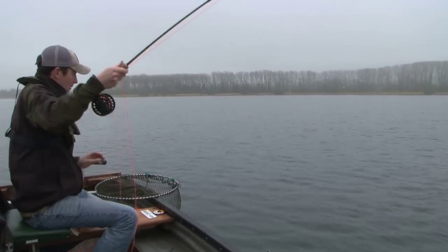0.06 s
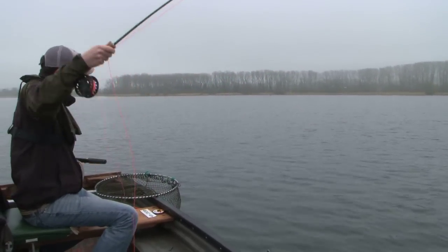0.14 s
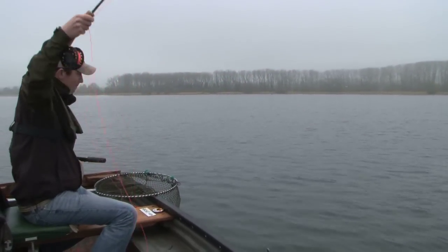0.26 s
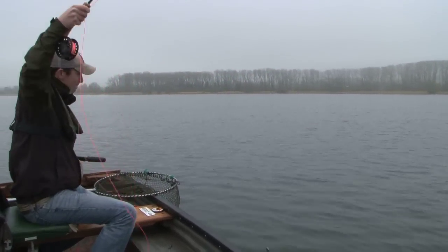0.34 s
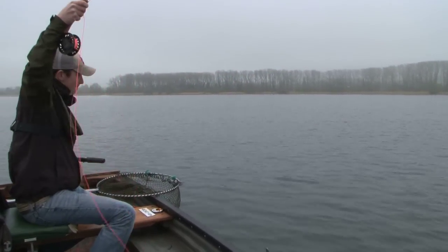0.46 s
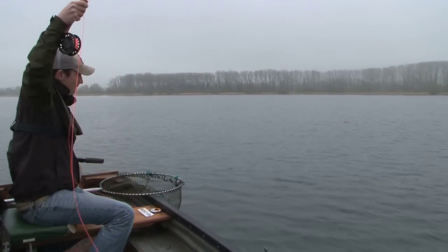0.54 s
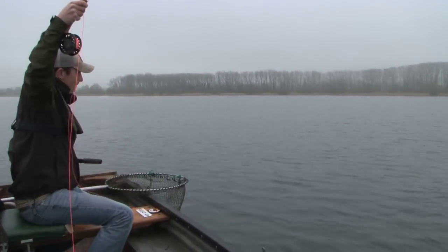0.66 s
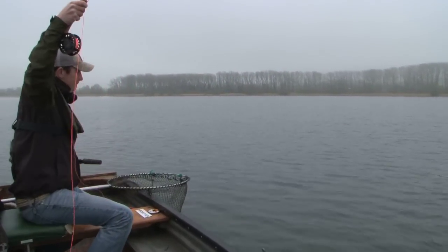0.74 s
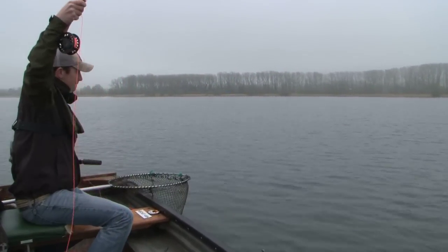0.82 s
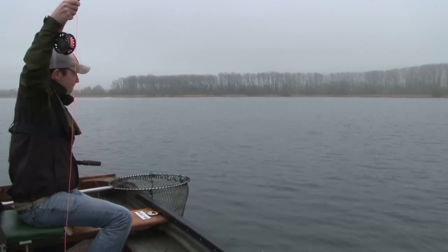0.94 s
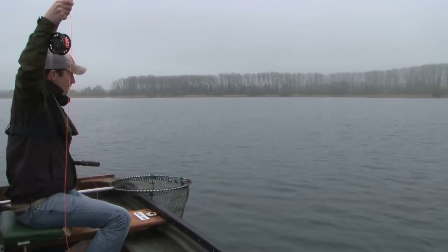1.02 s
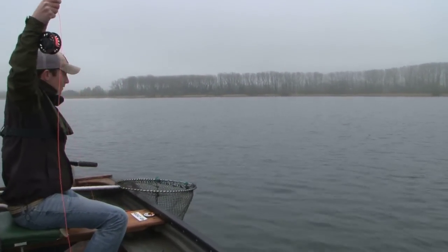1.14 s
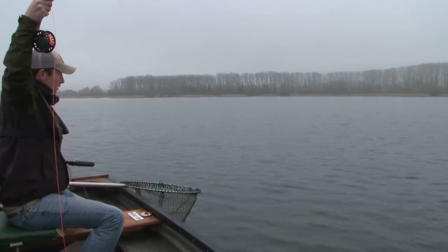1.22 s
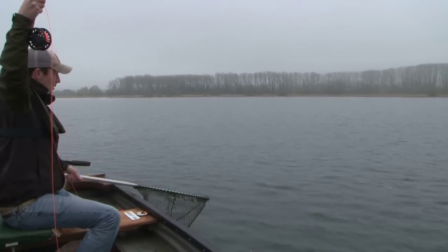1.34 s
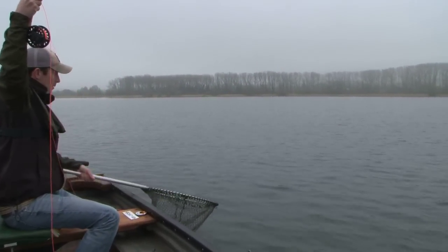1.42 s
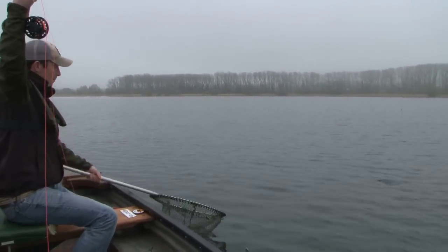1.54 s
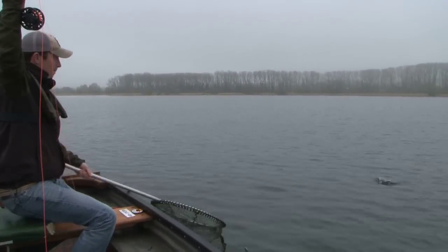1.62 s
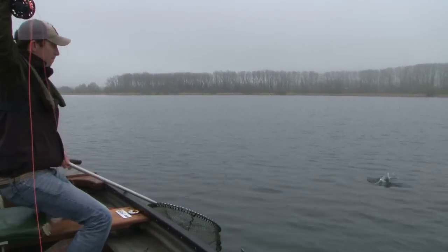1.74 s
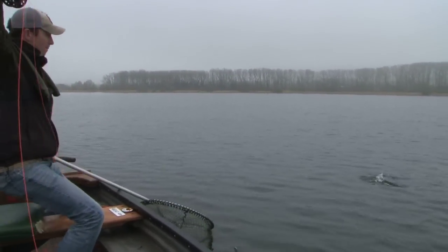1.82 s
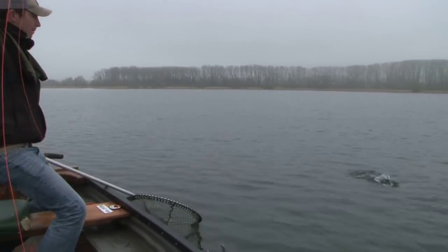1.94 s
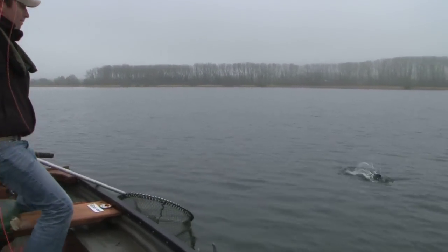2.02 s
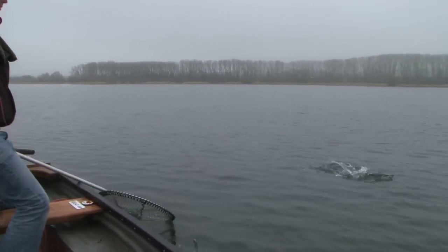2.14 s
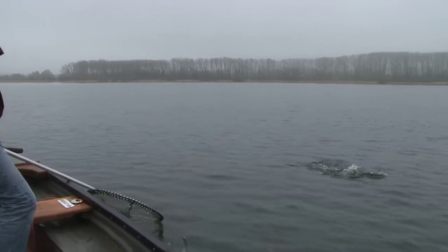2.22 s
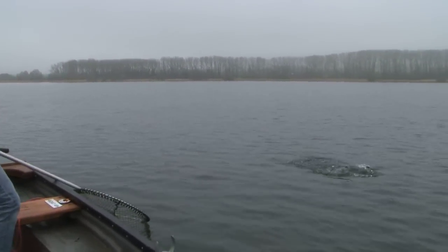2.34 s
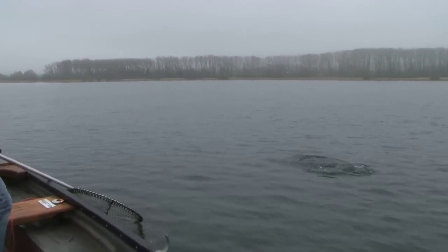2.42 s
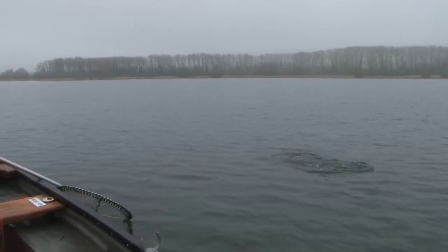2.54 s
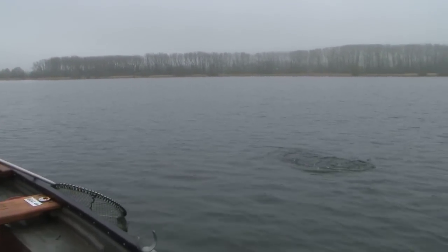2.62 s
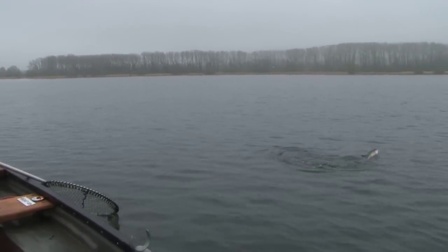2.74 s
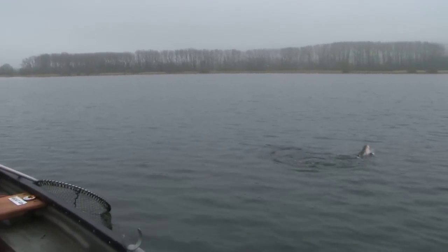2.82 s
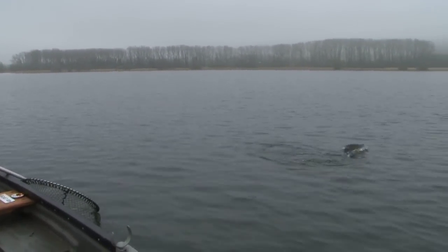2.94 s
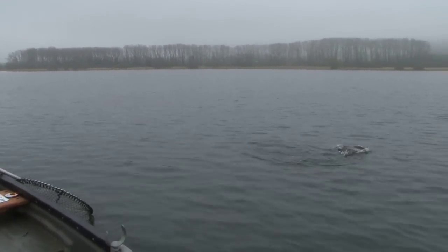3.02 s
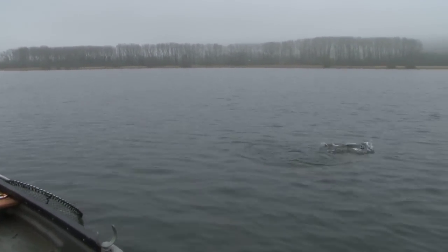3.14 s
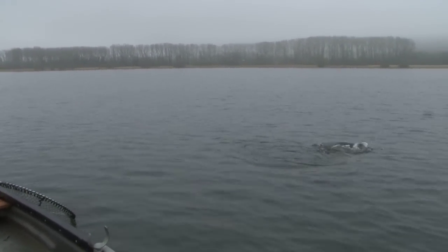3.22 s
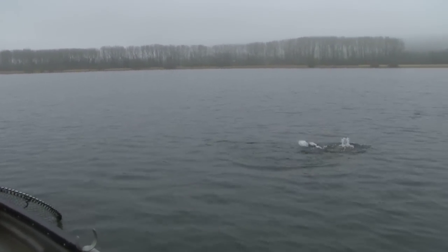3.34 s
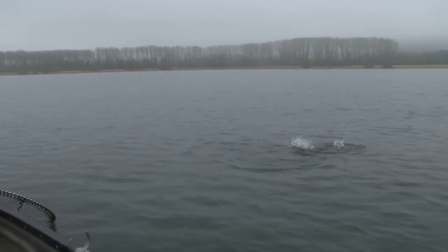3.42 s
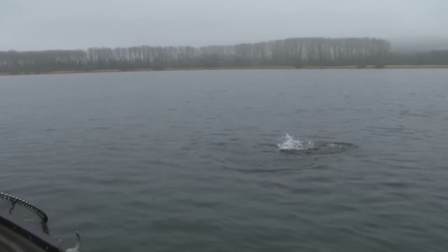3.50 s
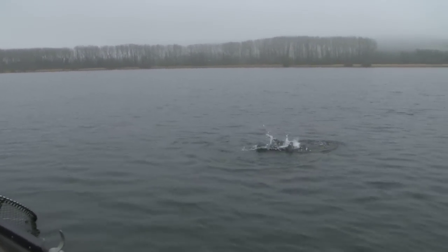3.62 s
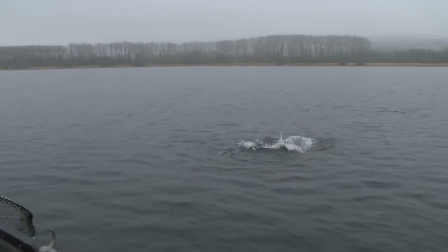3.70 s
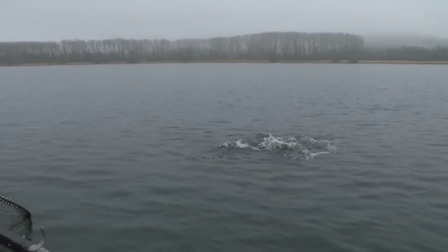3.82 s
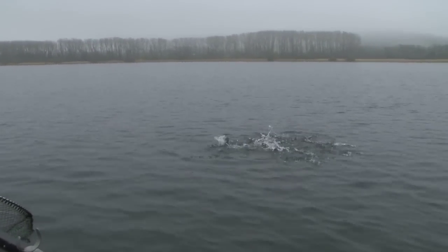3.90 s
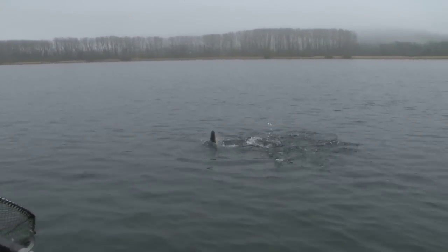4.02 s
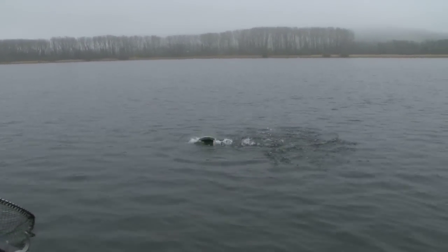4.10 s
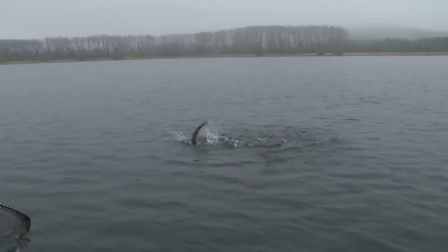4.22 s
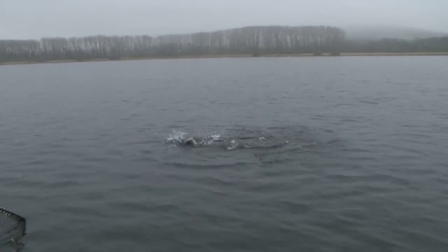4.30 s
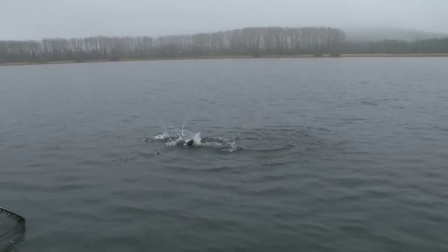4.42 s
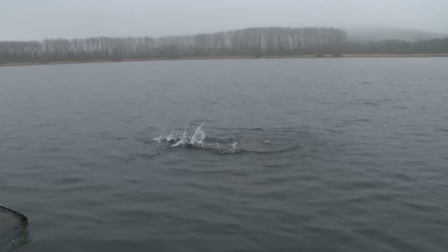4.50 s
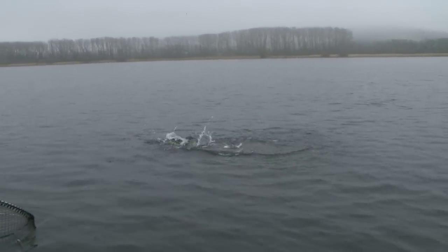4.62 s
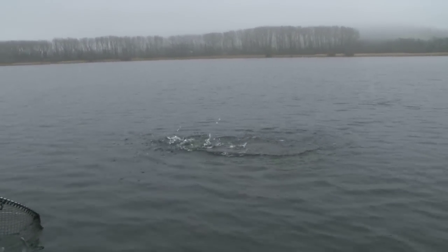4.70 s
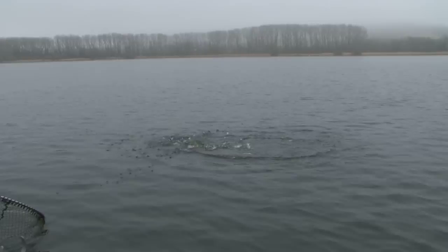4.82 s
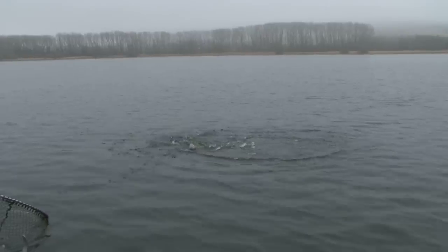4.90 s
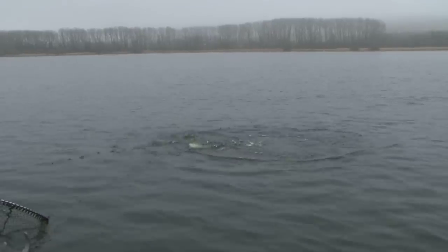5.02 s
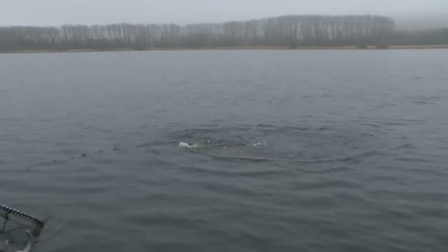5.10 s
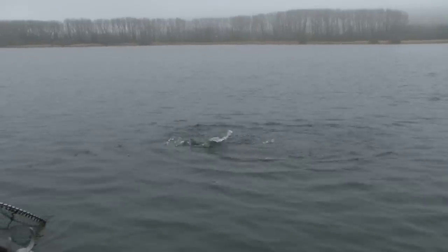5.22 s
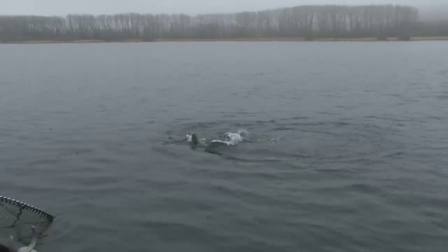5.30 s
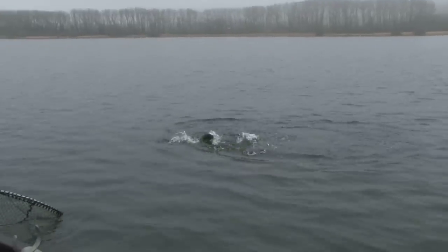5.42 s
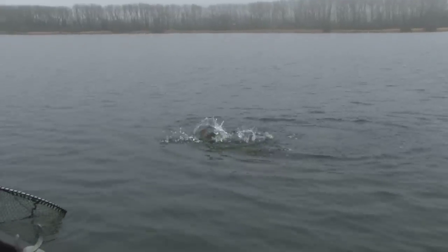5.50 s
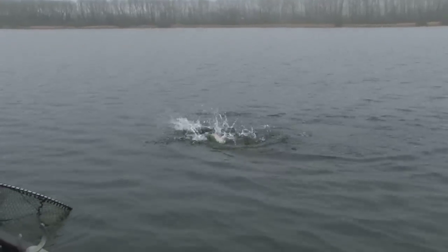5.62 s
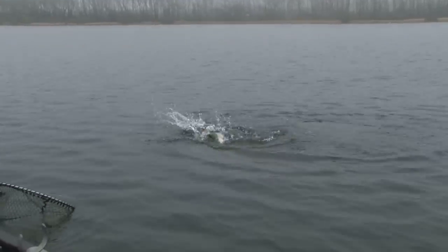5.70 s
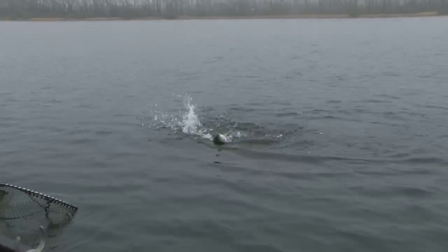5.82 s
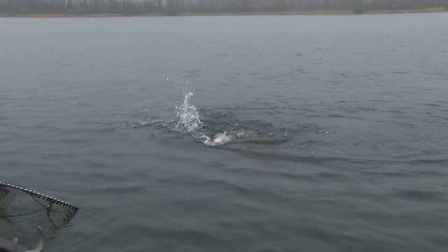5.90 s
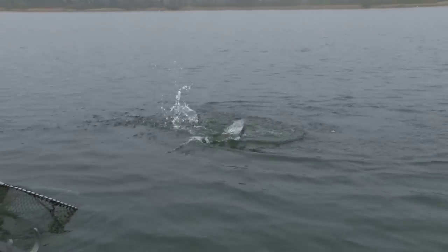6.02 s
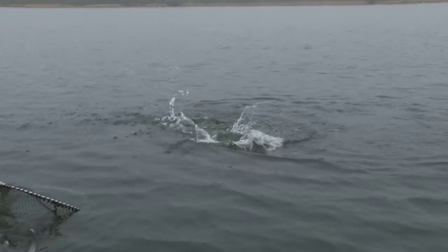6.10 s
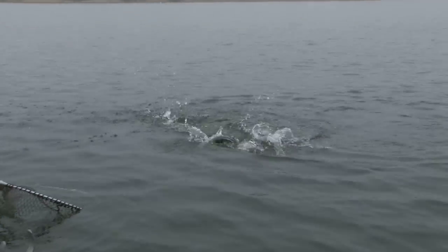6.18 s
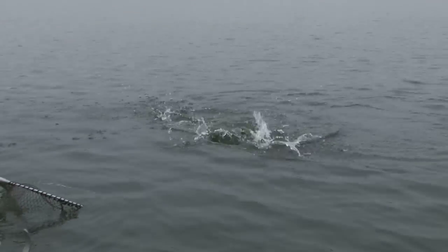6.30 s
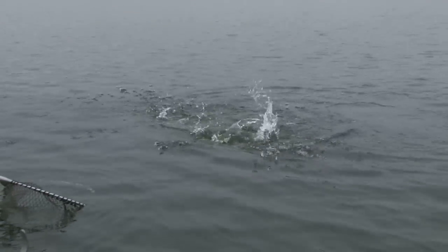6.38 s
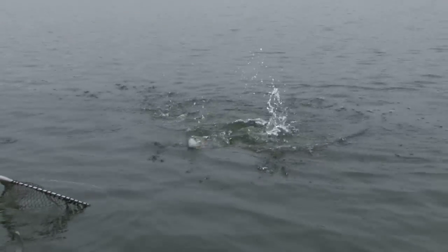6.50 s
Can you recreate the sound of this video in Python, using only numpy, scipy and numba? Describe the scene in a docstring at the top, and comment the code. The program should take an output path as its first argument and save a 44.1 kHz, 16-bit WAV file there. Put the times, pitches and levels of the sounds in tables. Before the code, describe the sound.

Quiet wind rumble and wooden boat knocks give way to a large fish churning and slapping the water, with one sharp tail crack.

```python
"""A light wind rumbles and hisses over a calm lake; beside it cloth rustles and tackle knocks in a small
boat (driven resonances), a few drops drip and faint whistles glide. Then a hooked fish thrashes a few metres
away: bubble swarms churn, plunged cavities gurgle and swell the low rumble, air pockets ring and noise bursts
slap. A soft hull thud and, later, a sharp double tail smack stand out, with more drips as the thrashing goes
on to the end. Open water gives no echo."""
import sys
import numpy as np
from scipy import signal
from scipy.fft import rfft, irfft
from scipy.io import wavfile
from scipy.ndimage import uniform_filter1d
from numba import njit

SR = 44100
rng = np.random.default_rng(int(sys.argv[2]) if len(sys.argv) > 2 else 0)


def unload_wav(signal):
    """Save mono or channel-first audio to the path in sys.argv[1] as 16-bit WAV at rate SR, clipped to [-1, 1]."""
    wavfile.write(
        sys.argv[1],
        SR,
        np.round(np.clip(np.atleast_2d(signal).T, -1, 1) * 32767).astype(np.int16),
    )


N = 288855
T = np.arange(N) / SR


def undb(db):
    """Logarithmic level: decibels to amplitude gain."""
    return 10 ** (np.asarray(db) / 20)


def unit(x):
    """Energy normalisation: scale to rms 1."""
    return x / np.sqrt(np.mean(x ** 2))


def add(out, s, x):
    """Superposition: mix x into out from time s."""
    i = max(int(s * SR), 0)
    out[i:i + len(x)] += x[:max(N - i, 0)]


def band(x, hz, width):
    """Simple resonance, with gain 1 at its centre."""
    hz = min(hz, SR * .45)
    quality = hz / min(width, SR / 3)
    return signal.lfilter(*signal.iirpeak(hz, quality, fs=SR), x)


def colour(x, points):
    """Minimum-phase filter through (Hz, dB) points, so clicks keep sharp fronts; rms 1."""
    hz, db = np.transpose(points)
    grid_hz = np.arange(N + 1) * SR / (2 * N) + 1
    log_gain = np.log(undb(np.interp(np.log(grid_hz), np.log(hz), db)))
    # folding the cepstrum onto positive time makes the filter causal
    cepstrum = irfft(log_gain)[:N]
    cepstrum[0] /= 2
    response = np.exp(rfft(2 * cepstrum, 2 * N))
    return unit(irfft(rfft(x, 2 * N) * response)[:N])


def walk(rate):
    """Low-passed randomness: a smooth wander of rms 1, with rate new values a second."""
    k = max(int(SR / rate), 1)
    steps = np.repeat(rng.standard_normal(N // k + 1), k)[:N]
    return unit(uniform_filter1d(steps, k))


def fade(t, t60):
    """Exponential decay, falling 60 dB in t60 seconds."""
    return np.exp(-np.log(1000) * t / t60)


def swell(start, length, attack_s, t60):
    """Build-up and decay: rises to full by start, holds for its length, then dies exponentially."""
    attack = np.clip((T - start) / attack_s + 1, 0, 1) ** 2
    return attack * fade(np.maximum(T - start - length, 0), t60)


@njit
def ring(starts, sizes, pitches, t60s, rises):
    """Damped bubble resonance: tones swell in their first cycle and climb as they near the surface."""
    out = np.zeros(N)
    for k in range(len(starts)):
        first, count, phase = int(starts[k] * SR), int(t60s[k] * SR) + 1, 0.
        for i in range(min(count, N - first)):
            age = i / count
            phase += min(pitches[k] * 2 ** (rises[k] * age) / SR, .45)  # in cycles
            envelope = np.exp(-6.9 * age) * min(1., phase * 1.4)
            out[first + i] += sizes[k] * envelope * np.sin(2 * np.pi * phase)
    return out


def swarm(points, low_hz, high_hz, cycles, rise, spread_db, clump_db, wash, count):
    """Bubble statistics: many rings, a few much stronger, over a noise wash, in uneven clumps of level."""
    when, pitch, size, life, climb = rng.random((count, 5)).T
    hz = low_hz * (high_hz / low_hz) ** pitch
    sizes = undb(-spread_db * np.log(size + 0.051)) * (-1) ** np.arange(count)
    t60 = cycles * (0.47 + 2 * life ** 2) / hz
    grains = ring(when * N / SR, sizes, hz, t60, 2 * rise * climb)
    water = colour(grains, points) + wash * colour(rng.standard_normal(N), points)
    # level the energy over time, so that the flow can set it; the bubbles share it unevenly
    water = water / np.sqrt(uniform_filter1d(water ** 2, SR // 14) + 1e-9)
    return unit(water * undb(clump_db * walk(90)))


# Spectrum of the low rumble and hiss. Each row: frequency in Hz, relative level in dB.
AIR = [(12, -39), (20, -3), (49, 1.5), (97, -6), (147, -4.5), (229, -11.5), (286, -12), (347, -18.5),
       (674, -20), (1640, -30), (2280, -30.5), (4080, -46.5), (13800, -51), (15000, -96)]
# Strength of the low rumble, from wind and, near 1.9 and 3.7 s, from the wakes of the plunges.
# Each row: time in seconds, gain in dB.
RUMBLE_STRENGTH = [(0, 3.5), (.6, 4.5), (1.4, 2.5), (1.9, 8), (2.4, 0), (3.2, 0), (3.7, 4), (4.8, -2),
                   (5.6, -2.5), (6.55, 0)]


def breeze_and_rumble(rumble_hz=190, air_db=-50):
    """Noise split into bands: an unsteady low rumble of wind and plunge wakes, under a smooth distant hiss."""
    air = colour(rng.standard_normal(N), AIR)
    rumble = signal.sosfiltfilt(signal.butter(2, rumble_hz, fs=SR, output="sos"), air)
    hiss = air - rumble
    rumble_db = np.interp(T, *np.transpose(RUMBLE_STRENGTH)) + 1.2 * walk(4.0)
    return undb(air_db) * (hiss + rumble * undb(rumble_db))


# The angler lifts the rod, then stands up. Each row: time in seconds, level of the rub of cloth in dB,
# level of the swish of the waterproof shell in dB.
RUSTLE = [(0, -53, -70), (.2, -58.5, -84), (.35, -60, -77), (.45, -73, -85), (.8, -85, -87),
          (1.52, -64, -97), (1.57, -53.5, -63), (1.78, -48.5, -54.5), (1.9, -90, -72), (2.1, -72, -60.5),
          (2.42, -75, -66), (2.55, -88, -97), (3, -86, -100)]
# Spectrum of the rubbing cloth. Each row: frequency in Hz, relative level in dB.
CLOTH_COLOUR = [(100, -25), (300, 4), (600, 3), (1500, -6.5), (3500, -3.5), (4600, -9.5), (5500, -14),
                (15000, -29.5)]
# Spectrum of the swishing shell. Each row: frequency in Hz, relative level in dB.
SHELL_COLOUR = [(1500, -7), (4500, 5), (8500, -0.5), (11000, -12.5), (15500, -3.5)]


def rustle(crinkle=0.63):
    """Friction noise: cloth slides in small uneven slips, and the stiff shell crinkles as it does."""
    s, rub_db, swish_db = np.transpose(RUSTLE)
    slips = rng.standard_normal(N) * undb(2 * walk(100))
    crinkles = slips * np.exp(crinkle * walk(1500))
    rub = colour(slips, CLOTH_COLOUR) * undb(np.interp(T, s, rub_db))
    swish = colour(crinkles, SHELL_COLOUR) * undb(np.interp(T, s, swish_db))
    return rub + swish


# Knocks in the boat. Each row: start in seconds, relative level in dB, brightest frequency of the push in Hz,
# decay time (60 dB) of the rattle in seconds.
KNOCKS = [(.005, -41.5, 570, 0.11), (0.093, -38, 830, 0.23), (0.254, -44, 1550, .05),
          (.590, -33, 2370, 0.037), (0.595, -28.5, 570, 0.14), (0.647, -39.5, 820, 0.16),
          (.682, -48.5, 3800, 0.035), (0.819, -34, 1650, 0.064), (0.993, -50.5, 5960, 0.045),
          (1.023, -56, 5500, .04), (1.081, -38.5, 734, 0.12), (1.547, -42, 1010, 0.17),
          (1.623, -39, 790, 0.12)]
# Resonances of the boat. Each row: frequency in Hz, width in Hz, relative level in dB.
BOAT = [(454, 150, 11), (580, 15, 6.5), (750, 290, -3), (960, 230, -10), (1570, 100, -5), (1810, 140, 2),
        (2220, 170, -14), (3600, 450, -38), (6450, 2500, -32)]


def knocks(contact_s=0.0041, gain_db=-5):
    """Forced resonance: net handle, boots and tackle push sharply and rattle, and the boat rings."""
    out, t = np.zeros(N), T[:SR // 3]
    for s, db, hz, t60 in KNOCKS:
        rattle = fade(t, t60)
        force = rng.standard_normal(len(t)) * (fade(t, contact_s) + 2.1 * rattle)
        push = band(band(force, hz, .7 * hz), hz, .7 * hz)
        body = sum(undb(mode_db) * band(push, mode_hz, width) for mode_hz, width, mode_db in BOAT)
        add(out, s, undb(db + gain_db) * unit(body) * np.sqrt(np.mean(rattle ** 2)))
    return out


# Single close drops, each leaving a bubble. Each row: start in seconds, relative level in dB, starting pitch
# in Hz, decay time (60 dB) in seconds, rise in octaves over that decay.
DRIPS = [(.070, -46, 4500, .05, .2), (.256, -40, 1520, .06, .1), (4.850, -48, 4800, .02, .7),
         (4.915, -33, 4400, .014, 1.5), (4.947, -42, 2900, .025, .9), (4.983, -41, 2230, .035, 1.2),
         (4.997, -37, 5500, .01, 1.3), (5.130, -39, 2450, .022, .9), (5.200, -49, 1200, .07, 1.8),
         (5.281, -38, 2000, .03, 1.2)]


def drips(gain_db=1):
    """Bubble resonance: single drops leave chirping bubbles, a few close by, many out in the splash."""
    far = strays(low_hz=695, high_hz=4270, gain_db=2.5, spread_db=8, cycles=39, count=170)
    far_rise_oct = 0.95
    rows = list(DRIPS) + [(*row, far_rise_oct) for row in far]
    s, db, hz, t60, rise = np.array(rows, float).T.copy()
    return ring(s, undb(db + gain_db), hz, t60, rise)


# Faint thin whistles. Each row: start in seconds, length in seconds, nominal start pitch in Hz,
# nominal end pitch in Hz, level in dB before the flutter.
WHISTLES = [(0.338, 0.24, 2410, 2700, -64.5), (0.529, 0.183, 2800, 2720, -59),
            (0.712, 0.098, 2580, 1830, -65), (.80, 0.1, 3950, 3150, -78), (0.838, 0.17, 2480, 2830, -70),
            (.94, 0.18, 2870, 2700, -66), (1.10, .11, 2740, 2820, -68), (1.143, 0.1, 2900, 2200, -66),
            (1.249, 0.3, 3170, 3400, -69)]


def whistles(haze_db=-62):
    """Frequency and amplitude modulation: faint wavering glides in a haze of similar pitch."""
    out = np.zeros(N)
    wobble, flutter = 1 + .018 * walk(400), undb(3 * walk(50))
    for s, length, start_hz, end_hz, db in WHISTLES:
        n = int(length * SR)
        hz = np.linspace(start_hz, end_hz, n) * wobble[int(s * SR):][:n]
        add(out, s, undb(db) * np.hanning(n) * np.sin(2 * np.pi * np.cumsum(hz) / SR))
    haze = unit(band(band(rng.standard_normal(N), 2800, 1000), 2600, 1000))
    haze_shape = np.interp(T, [.2, .4, 1.5, 1.7], [0.038, 0.4, 0.48, 0])
    return out * flutter + undb(haze_db) * haze * haze_shape


# Strokes of the fish's body and tail. Each row: start of the hold in seconds, length of the hold in seconds,
# strength in dB, depth in dB (deep strokes burble, shallow ones throw spray).
STROKES = [(1.682, 0.047, -47.5, 10.5), (1.87, 0.041, -56.5, 9), (2.01, 0.16, -47.5, 2.5),
           (2.298, 0.016, -51, 3.5), (2.37, 0.04, -53, 7), (2.90, 0.041, -59.5, 4),
           (2.969, 0.0075, -49.5, 4), (3.072, 0.13, -49.5, 6.5), (3.233, 0.033, -41, 2.5),
           (3.37, 0.15, -50, 5.5), (3.506, 0.09, -45.5, 4.5), (3.648, 0.081, -43.5, -5),
           (3.778, 0.22, -41, -4), (3.924, 0.021, -40.5, 3), (4.05, 0.078, -41.5, 1.5),
           (4.26, 0.01, -48.5, -0.5), (4.351, 0.023, -43.5, -4), (4.42, 0.049, -52, -1),
           (4.53, 0.04, -45, -2), (4.63, 0.047, -51.5, 2), (4.722, 0.089, -47.5, -5), (4.98, 0.18, -58, -8),
           (5.275, .07, -50.5, -4), (5.408, 0.046, -40, -1), (5.529, .09, -41.5, 2.5),
           (5.69, 0.096, -44.5, -3), (5.82, 0.15, -45.5, -7.5), (6.03, 0.037, -44.5, -3),
           (6.12, 0.031, -42, -8), (6.212, 0.11, -41.5, -1), (6.33, 0.069, -41.5, -11),
           (6.48, 0.017, -54, 12)]


def flow(per_depth, fall_back_db):
    """Energy summation: amplitude of water stirred by strokes and their fall-back; per_depth in dB per dB."""
    stroke_attack_s, stroke_t60_s = 0.058, 0.35
    fall_back_s, fall_back_t60_s = 0.091, 2.1  # the thrown water comes down again
    power = 1e-14
    for s, length, db, depth in STROKES:
        stroke = swell(s, length, stroke_attack_s, stroke_t60_s)
        fall_back = undb(fall_back_db) * swell(s + fall_back_s, length, fall_back_s, fall_back_t60_s)
        power = power + undb(db + per_depth * depth) ** 2 * (stroke ** 2 + fall_back ** 2)
    return np.sqrt(power)


def strays(low_hz, high_hz, gain_db, spread_db, cycles, count):
    """Random impacts: thrown water lands as hard as the surface is stirred; rows (s, dB, Hz, t60 s)."""
    when, pitch, size = rng.random((count, 3)).T
    hz = low_hz * (high_hz / low_hz) ** pitch
    stirred = flow(0, fall_back_db=-8)[(when * N).astype(int)]
    db = 20 * np.log10(stirred) + gain_db + spread_db * (2 * size - 1)
    return list(zip(when * N / SR, db, hz, cycles / hz))


# Spectrum of the big bubbles. Each row: frequency in Hz, relative level in dB.
BUBBLING = [(70, -31), (150, -18), (280, -5), (450, 1), (750, 8.5), (1200, 5), (1900, -9), (4000, -68)]
# Spectrum of the falling drops. Each row: frequency in Hz, relative level in dB.
PATTER = [(500, -8.5), (1100, -7), (1800, -4), (2600, -1), (3600, -3), (4600, -12), (8000, -48)]
# Spectrum of the fine spray. Each row: frequency in Hz, relative level in dB.
SPRAY = [(2000, -19), (3800, 1.5), (4800, 0), (7000, -5.5), (9000, -8.5), (11500, -16), (13500, -18.5),
         (16000, -27)]


def churn():
    """Superposed bubble swarms: big ones burble, drops patter in uneven gobs, spray crackles."""
    bubbling = swarm(BUBBLING, 259.1, 1405, cycles=27.0, rise=0.44, spread_db=5.5,
                     clump_db=0.64, wash=0.39, count=1600)
    patter = swarm(PATTER, 1005, 4470, cycles=25.6, rise=0.26, spread_db=5.0,
                   clump_db=2.0, wash=0.53, count=5200)
    spray = swarm(SPRAY, 3600, 13800, cycles=16, rise=0.4, spread_db=5.5,
                  clump_db=2.5, wash=0.74, count=12000)
    gobs = undb(1.4 * walk(45))
    spray_db = -7.5 - 0.03 * (T - 2.6)  # the spray eases very slightly with time
    burble = bubbling * undb(-0.5) * flow(0.71, fall_back_db=-11.5)
    drops = patter * gobs * undb(2.5) * flow(0, fall_back_db=-11.5)
    crackle = spray * undb(spray_db) * flow(-0.49, fall_back_db=-13)  # depth takes spray away
    return burble + drops + crackle


# Deep plunges, where the fish drags a cavity of air under. Each row: time of full strength in seconds,
# level in dB before the wake is added.
PLUNGES = [(1.662, -29), (3.632, -25.5)]
# Spectrum of the large, low bubbles. Each row: frequency in Hz, relative level in dB.
GURGLE = [(45, -27), (85, -3), (180, 5.5), (260, -11.5), (380, -7.5), (600, -38), (1500, -65)]


def plunges(attack_s=0.0092, cavity_t60_s=0.27, wake_t60_s=0.64, wake_db=-12.5):
    """Cavity collapse: the cavity breaks quickly into large, low bubbles and its wake gurgles on."""
    gurgle = swarm(GURGLE, 86, 423, cycles=15.4, rise=0.16, spread_db=9, clump_db=4.0, wash=0.9, count=900)
    strength = np.zeros(N)
    for s, db in PLUNGES:
        cavity = swell(s, 0, attack_s, cavity_t60_s)
        wake = undb(wake_db) * swell(s, 0, attack_s, wake_t60_s)
        strength += undb(db) * (cavity + wake)
    return gurgle * strength


# Pockets of air shut in by the fish. Each row: start in seconds, relative level in dB, starting pitch in Hz.
GULPS = [(1.659, -20, 93.4), (1.683, -25, 174), (1.730, -36, 558), (1.768, -35, 90.1), (1.865, -28.5, 634),
         (1.890, -33, 593), (2.055, -36, 560), (2.143, -27.5, 698), (2.146, -34.5, 319),
         (2.361, -37.5, 614), (3.064, -32.5, 680), (3.095, -24.5, 575), (3.188, -33.5, 439),
         (3.235, -23, 594), (3.532, -29.5, 490), (3.508, -38, 116), (3.625, -18.5, 180),
         (3.636, -16.5, 225.6), (3.646, -30, 105), (3.657, -22.5, 178.4), (3.720, -42, 165),
         (3.790, -33.5, 604), (3.901, -9, 360), (3.921, -19, 417), (3.934, -17.5, 407), (4.027, -30.5, 224),
         (4.347, -32, 587), (4.526, -23.5, 1550), (4.542, -28.5, 804), (4.590, -41, 329),
         (5.147, -32, 1420), (5.305, -32.5, 1080), (5.445, -25.5, 516), (5.565, -27.5, 900),
         (5.692, -29.5, 370), (5.741, -30.5, 424), (6.059, -35.5, 703), (6.193, -19, 585),
         (6.274, -4.5, 497), (6.283, -17, 660)]


def gulps(gain_db=1.5, rise_oct=0.15):
    """Bubble resonance: trapped air rings, the louder the more briefly, and splits off a smaller bubble."""
    s, db, hz = np.transpose(GULPS)
    cycles = 24.2 * 2 ** ((-24 - db) / 14.5)  # 24.2 cycles at -24 dB, halved by each 14.5 dB more
    t60 = cycles / hz
    size, rise = undb(db + gain_db), np.full(len(s), float(rise_oct))
    pocket = ring(s, size, hz.copy(), t60, rise)
    split_s = s + 2.4 / hz  # after 2.4 cycles of the starting pitch
    split = ring(split_s, size * undb(-12.5), hz * 1.68, t60, rise)
    return pocket + split


# The loudest sheets of water slapping down. Each row: start in seconds, relative level in dB,
# brightest frequency in Hz, decay time (60 dB) in seconds.
SLAPS = [(1.689, -31, 2090, 0.035), (1.762, -26, 2600, 0.038), (1.979, -32, 3000, 0.068),
         (1.989, -24, 1740, 0.085), (2.077, -19.5, 2980, 0.017), (2.097, -36, 9500, 0.006),
         (2.308, -22.5, 2820, 0.017), (2.324, -28.5, 1830, 0.031), (2.976, -34, 1760, 0.11),
         (2.981, -18, 1980, 0.018), (3.227, -22, 2920, 0.071), (3.261, -20.5, 1650, 0.014),
         (3.554, -24, 1310, 0.051), (3.697, -23, 3230, 0.078), (3.899, -22.5, 1240, 0.016),
         (3.966, -20.5, 1830, 0.013), (4.147, -21.5, 2860, 0.094), (4.277, -28.5, 2500, 0.12),
         (4.346, -7.5, 1520, 0.01), (4.3473, -3.5, 4040, 0.0081), (4.349, -21.5, 3800, .07),
         (4.364, -15, 2250, 0.027), (4.427, -24.5, 2050, 0.13), (4.553, -20.5, 1850, 0.043),
         (4.803, -23.5, 2120, 0.074), (4.899, -28, 3170, 0.024), (5.238, -30.5, 5700, 0.0072),
         (5.381, -31, 6460, 0.014), (5.564, -28, 2240, 0.13), (5.6114, -15, 3240, 0.036),
         (5.934, -22.5, 1650, 0.03), (6.102, -10, 4350, 0.004), (6.131, -22.5, 2860, 0.05),
         (6.191, -20.5, 1370, 0.013), (6.262, -17.5, 2030, 0.028), (6.275, -24, 1470, 0.075),
         (6.330, -19, 4200, 0.0075), (6.344, -26, 6000, 0.0055), (6.492, -17.5, 2060, 0.0063)]


def slaps(width=1.0, grain=0.78, attack_s=0.00006, crack_db=-13, gain_db=-6):
    """Impact noise: each slap is a fast-fading burst of tiny impacts, ringing the foam around one pitch."""
    out, t = np.zeros(N), T[:SR // 6]
    soften = signal.butter(1, 11000, fs=SR)
    flecks = strays(low_hz=1570, high_hz=8800, gain_db=11.5, spread_db=4.5, cycles=33, count=110)
    for s, db, hz, t60 in list(SLAPS) + flecks:
        impacts = rng.standard_normal(len(t)) * np.exp(grain * rng.standard_normal(len(t)))
        shape = fade(t, t60) * (1 - np.exp(-t / attack_s))
        crack = signal.lfilter(*soften, band(impacts * shape, hz, 2 * hz))
        foam = band(band(crack, hz, width * hz), hz, width * hz)
        slap = unit(foam + undb(crack_db) * crack)
        add(out, s, undb(db + gain_db) * slap * np.sqrt(np.mean(shape ** 2)) / shape.max())
    return out


# Soft thuds of the hull. Each row: start in seconds, level in dB, pitch in Hz, length in seconds.
THUDS = [(2.895, -26, 44, .055)]


def thuds():
    """Windowed low oscillation: the hull thuds softly under a half-sine envelope."""
    out = np.zeros(N)
    for s, db, hz, length in THUDS:
        t = T[:int(length * SR)]
        add(out, s, undb(db) * np.sin(np.pi * t / length) * np.sin(2 * np.pi * hz * t))
    return out


# The tail lands flat, a double pressure spike. Each row: time of the peak in seconds, relative level in dB,
# time constant of each flank in milliseconds.
SMACK = [(4.3477, -0.5, .1), (4.3491, -1.5, .06)]


def smack(low_hz=420):
    """Pressure impulse: sharp spikes, which the high-pass follows with a suction."""
    spikes = sum(undb(db) * np.exp(-np.abs(T - s) * 1000 / ms) for s, db, ms in SMACK)
    return undb(3) * signal.lfilter(*signal.butter(1, [low_hz, 9000], "band", fs=SR), spikes)


def scene():
    """Superposition of the open lake, the boat and the fish."""
    surroundings = breeze_and_rumble() + rustle() + knocks() + whistles() + thuds()
    fish = drips() + churn() + plunges() + gulps() + slaps() + smack()
    return (surroundings + fish)[None]


# Ripple in the response of the microphone. Each row: frequency in Hz, width in Hz, gain in dB.
RIPPLE = [(2730, 1100, -4), (4170, 790, -5.5), (4690, 180, 3), (5350, 340, -8.5), (5900, 350, 3),
          (6430, 370, -7), (7330, 500, 2.5), (8770, 400, 2.5), (9300, 300, -4.5), (11800, 210, -11),
          (12000, 930, 7), (14000, 1500, -1)]


def record(dry):
    """Linear filtering and saturation: the housing ripples the treble, peaks round off, the top is cut."""
    for hz, width, db in RIPPLE:
        dry = dry + (undb(db) - 1) * band(dry, hz, width)
    rounded = dry / (1 + (dry / .85) ** 4) ** .25
    top_hz = 15800
    return signal.sosfilt(signal.ellip(8, .2, 70, top_hz, fs=SR, output="sos"), rounded)


dry = scene()
out = record(dry)
unload_wav(out)
```